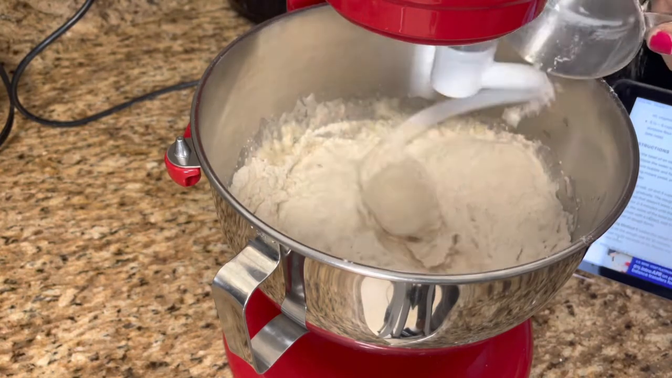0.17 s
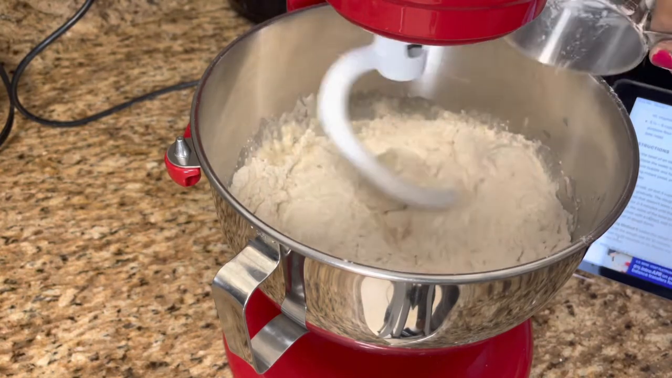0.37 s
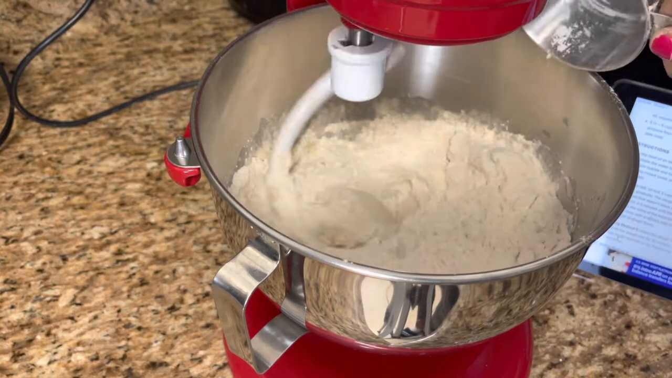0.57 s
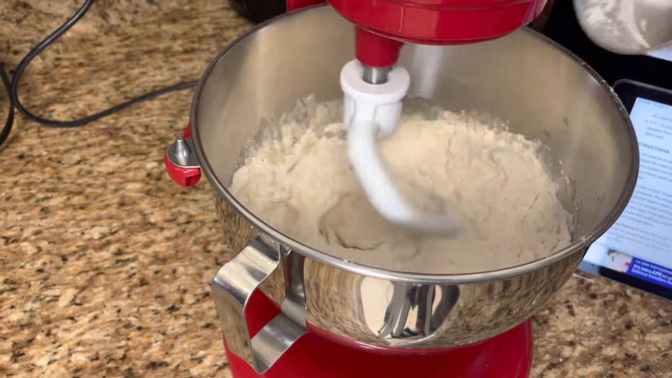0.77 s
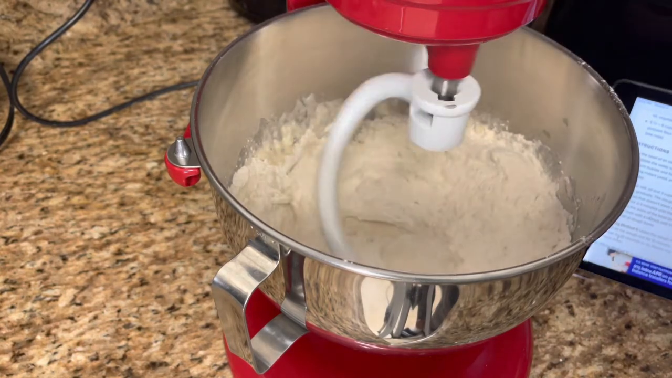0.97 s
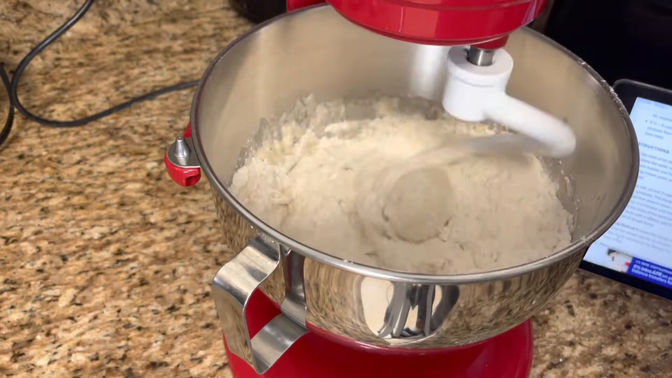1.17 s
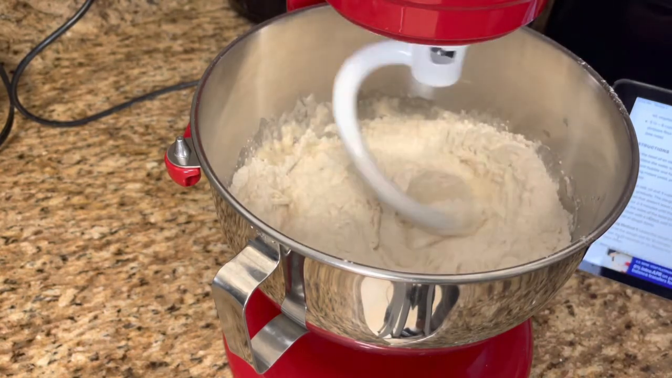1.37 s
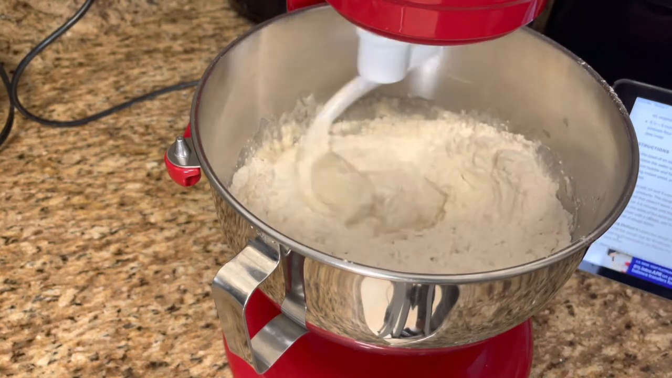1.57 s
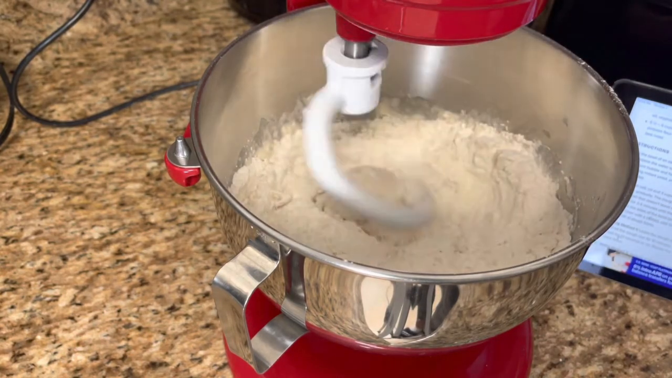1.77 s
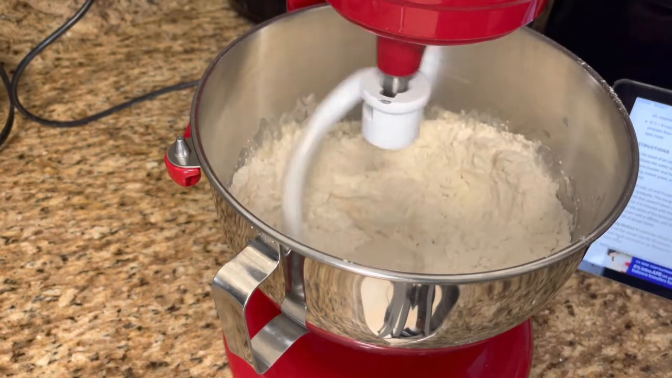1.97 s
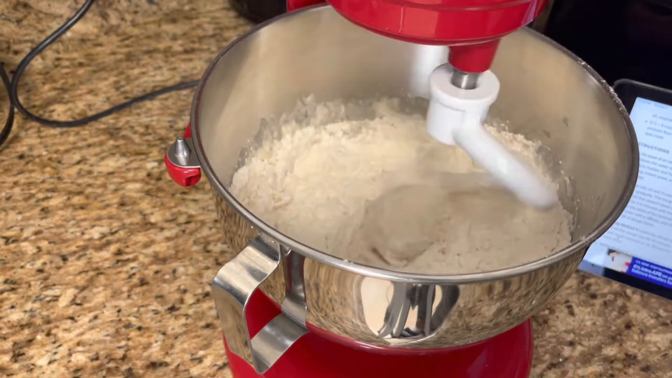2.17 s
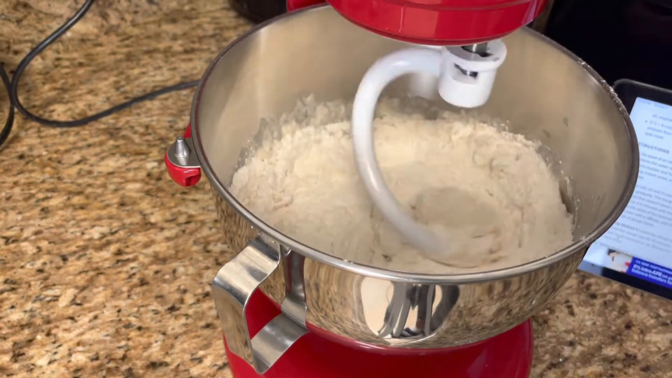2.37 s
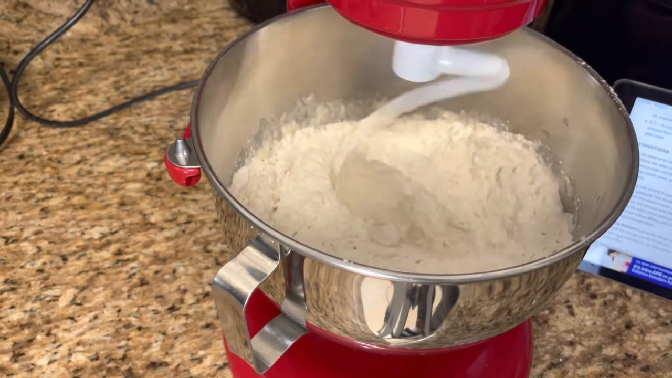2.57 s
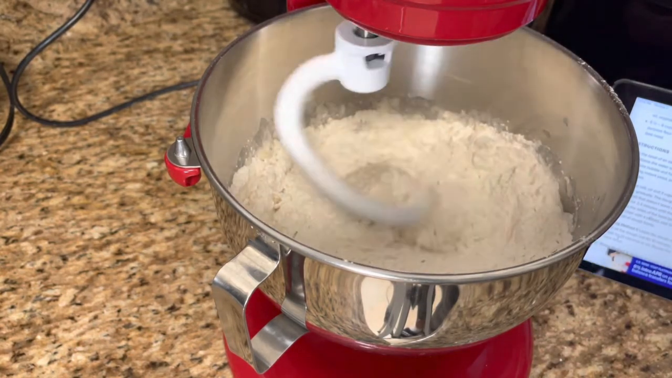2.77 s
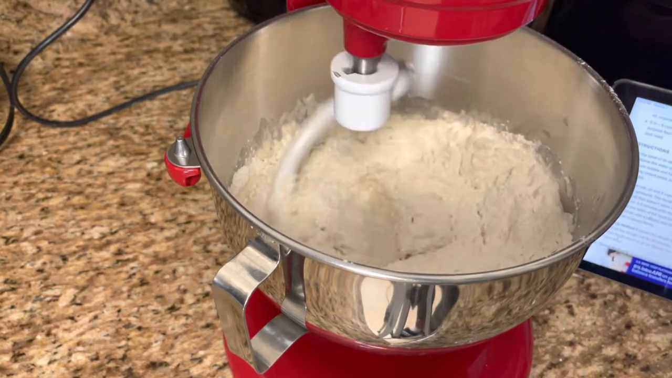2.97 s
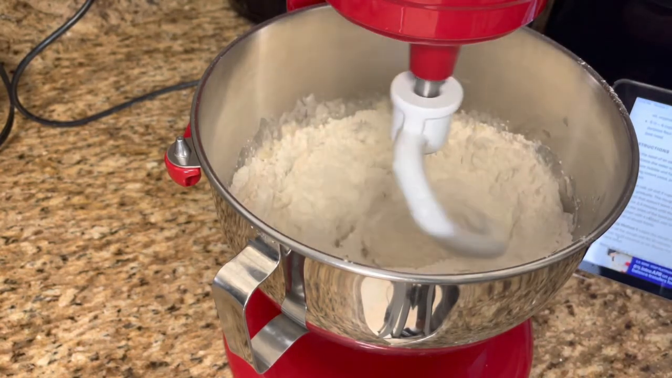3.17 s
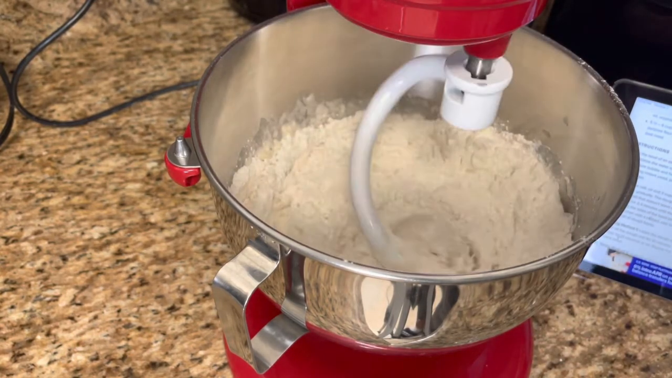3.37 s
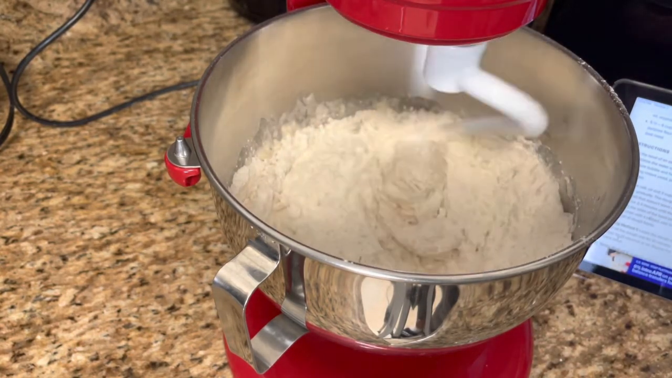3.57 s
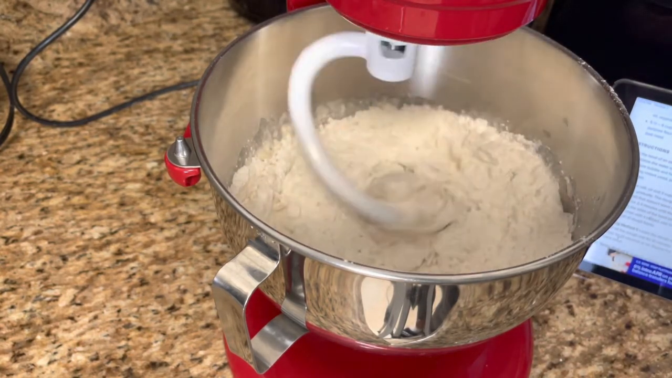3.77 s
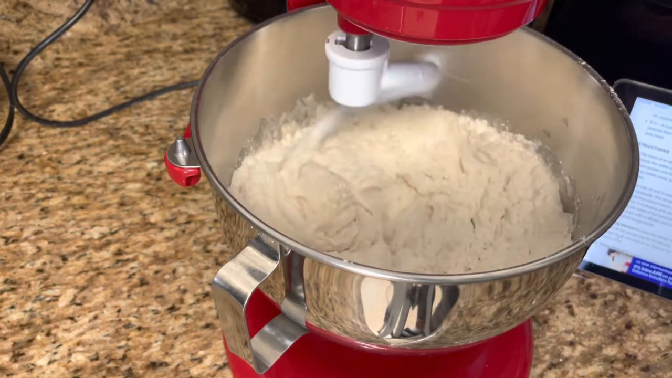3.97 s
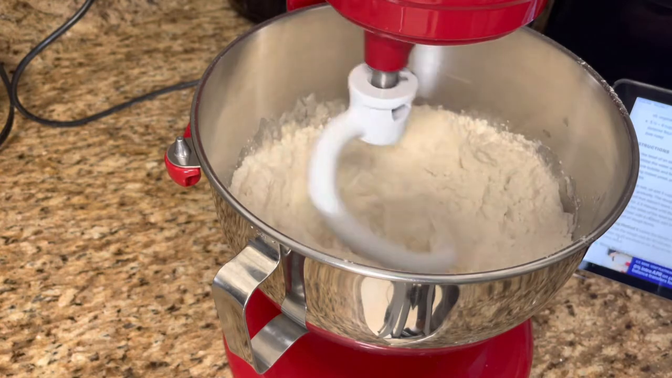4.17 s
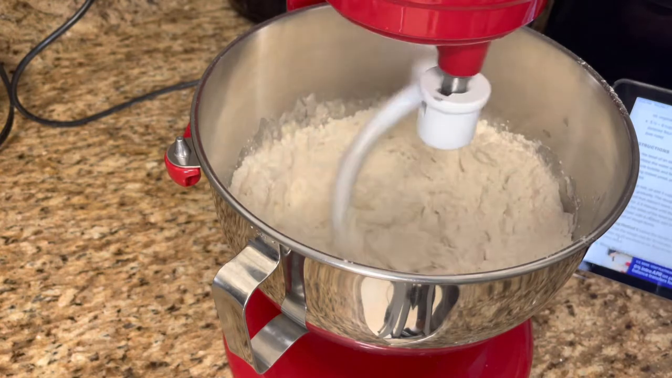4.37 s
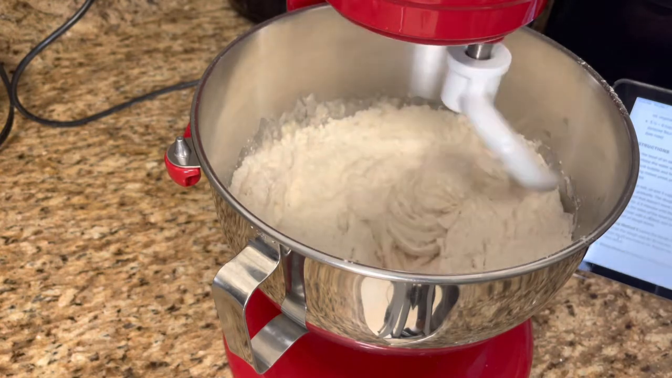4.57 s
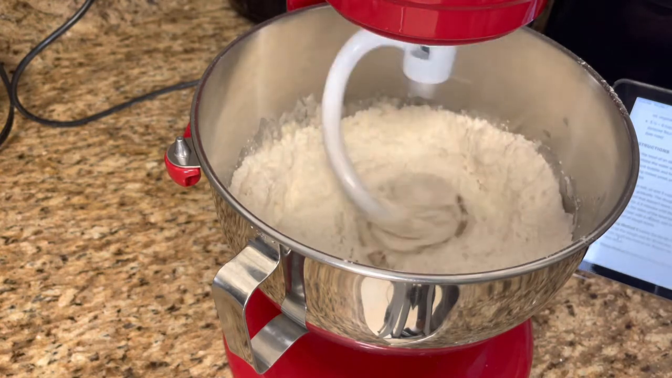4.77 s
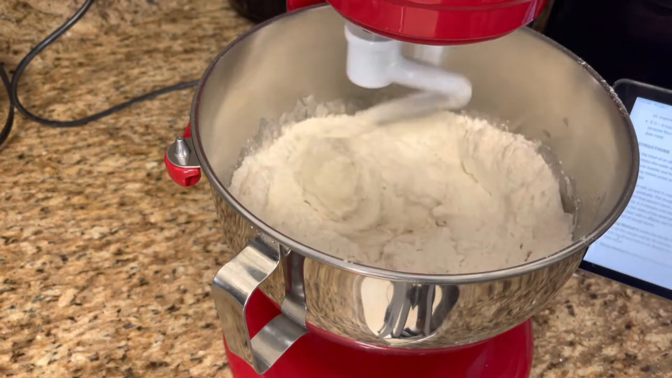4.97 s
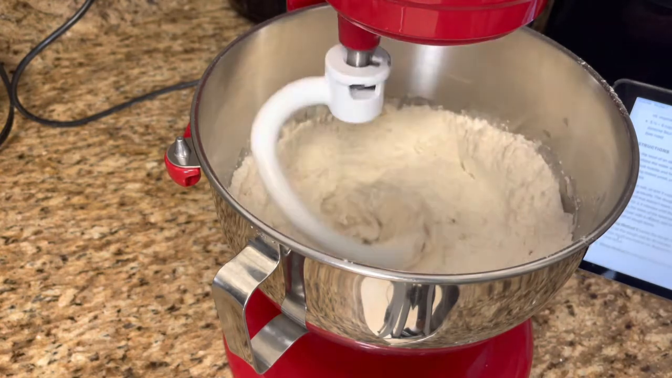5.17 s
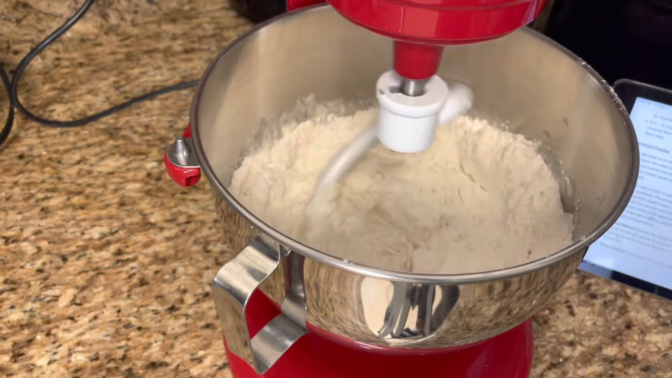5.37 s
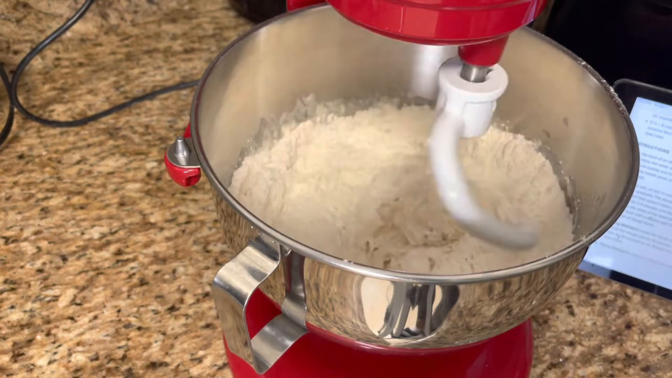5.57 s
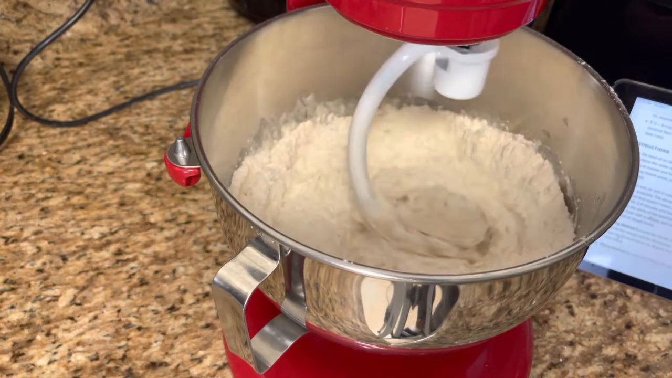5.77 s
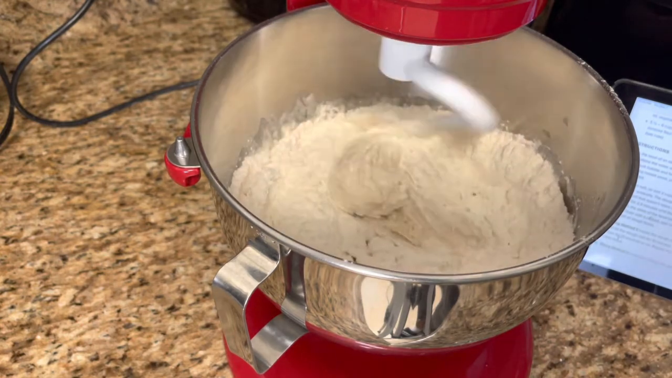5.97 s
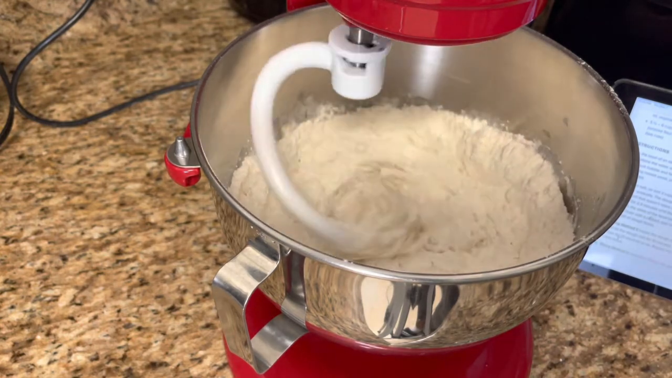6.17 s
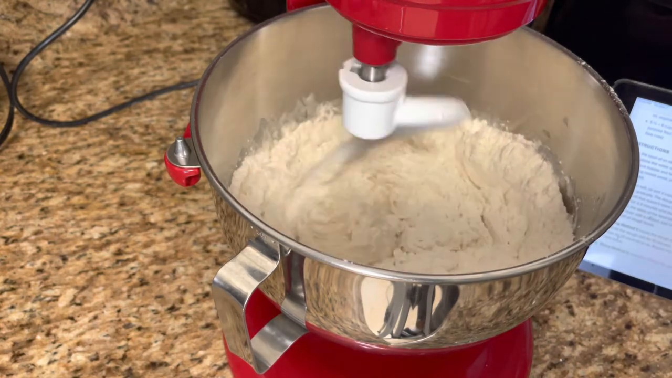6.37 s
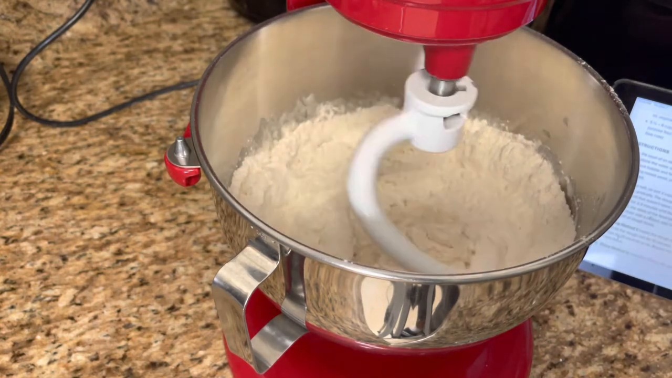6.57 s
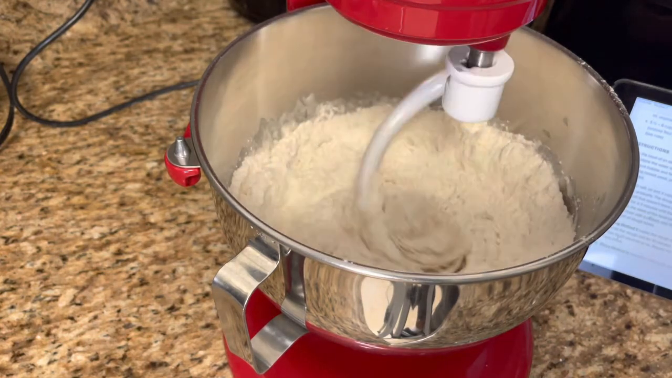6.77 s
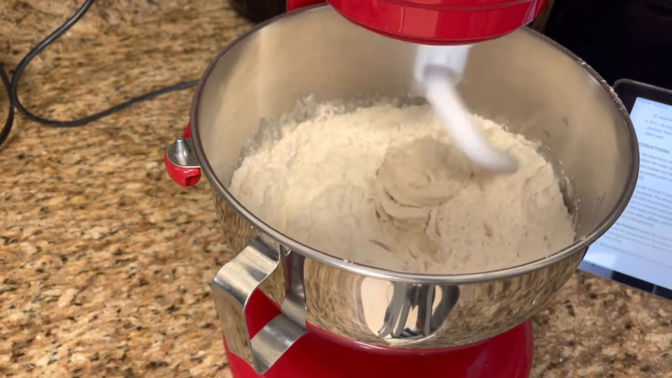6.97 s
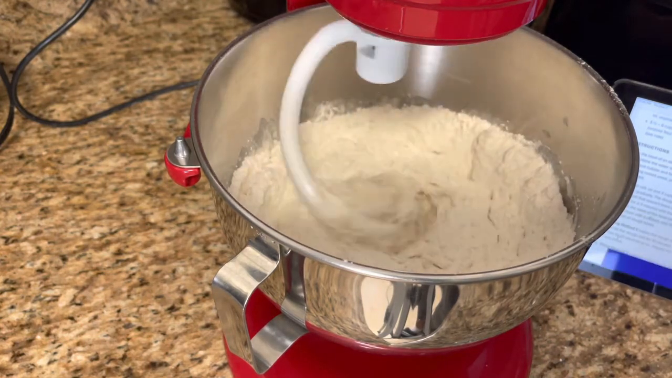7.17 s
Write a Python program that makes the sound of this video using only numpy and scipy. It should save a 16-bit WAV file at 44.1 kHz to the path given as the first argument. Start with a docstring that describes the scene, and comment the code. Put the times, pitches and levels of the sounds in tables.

```python
"""A stand mixer works floury dough in a steel bowl, close to a two-port microphone.
From the start, gear teeth whine, growl and shake the cast housing over mains hum and cooling air,
and the load on the hook slows and frees the shaft about three times a second. In the first half second
a steel cup knocks twice at the rim. Between two and four seconds the dough thumps softly three times.
The gears groan under load now and then, hardest near four seconds and again around six."""
import sys
import numpy as np
from scipy import signal
from scipy.fft import rfft, irfft, next_fast_len
from scipy.io import wavfile
from scipy.ndimage import uniform_filter1d, map_coordinates

SR = 44100
rng = np.random.default_rng(int(sys.argv[2]) if len(sys.argv) > 2 else 0)


def generate_wav(signal):
    """Clip the signal to [-1, 1] and save it as 16-bit WAV at the path in sys.argv[1]."""
    frames = np.transpose(np.atleast_2d(signal))
    scaled = np.clip(frames, -1, 1) * 32767
    pcm = np.round(scaled).astype(np.int16)
    wavfile.write(sys.argv[1], SR, pcm)


N = 318472

# Phase between the microphone ports. Each row: frequency in Hz, left lead in radians.
PORT_PHASE = [(60, 0), (7500, .2), (8500, -.3), (9700, -2.6), (10200, -3.14), (10500, -3.2), (11000, -4.2),
              (11350, -6.28)]


def amp(db):
    return 10 ** (np.asarray(db) / 20)


def unit_rms(x):
    return x / np.sqrt(np.mean(x ** 2) + 1e-20)


def along(hz, points_hz, values):
    """Values read on a log frequency axis."""
    return np.interp(np.log(hz + 1), np.log(np.asarray(points_hz) + 1), values)


def wobble(rate):
    """A smooth random curve, rate knots a second."""
    return map_coordinates(rng.standard_normal(int(N * rate / SR) + 4), [np.arange(N) * rate / SR])


def filtered(x, response):
    """x shaped by a complex frequency response."""
    size = next_fast_len(x.shape[-1] + SR // 4)
    return irfft(rfft(x, size) * response(np.fft.rfftfreq(size, 1 / SR)), size)[..., :x.shape[-1]]


def ports(pan_db, lead):
    """Complex gains of the left and right port, mean power 1; positive pan is to the left."""
    half = amp(pan_db / 2) * np.exp(.5j * lead)
    return np.array([half, 1 / half]) / np.sqrt((abs(half) ** 2 + abs(half) ** -2) / 2)


def peak(f, centre, width):
    """A resonance passed twice, so that its skirts are steep."""
    return (1j * f * width / (centre ** 2 - f * f + 1j * f * width)) ** 2


def resonate(x, modes):
    """x rung through a bank of panned resonances."""
    return filtered(x, lambda f: sum(amp(db) * ports(pan_db, lead)[:, None] * peak(f, hz, width)
                                     for hz, width, db, pan_db, lead in modes))


def tones(rows, cycles, drift, locked=False):
    """Stereo sines at multiples of a cycle count, drifting in level and phase; locked ones slip as one."""
    out = np.zeros((2, N))
    shared_slip = 2 * np.pi * rng.random() + drift * wobble(6)
    for multiple, db, pan_db, lead in rows:
        slip = shared_slip if locked else 2 * np.pi * rng.random() + drift * wobble(6)
        phase = 2 * np.pi * multiple * cycles + slip - lead / 2
        level = amp(db + 4 * drift * wobble(4))
        out += np.real(ports(pan_db, lead)[:, None] * level * np.exp(1j * phase))
    return np.sqrt(2) * out


def burst(t, low_hz, high_hz, rise, t60):
    """A stereo puff of noise between two soft band edges."""
    noise = 0.42 * rng.standard_normal((2, len(t))) + rng.standard_normal(len(t))
    band = unit_rms(filtered(noise, lambda f: f * f / (f * f + low_hz ** 2) / (1 + (f / high_hz) ** 4)))
    return band * (1 - np.exp(-t / rise)) * amp(-60 * t / t60)


def drive():
    """Shaft turns so far and gear levels; once a hook turn the dough slows the shaft and ducks the gears."""
    # The ride under the hook's swing. Each row: time in seconds, shaft turns a second,
    # whine level in dB, growl level in dB.
    ride = [(0, 8.723, -34.6, -33.0), (0.25, 8.638, -39.1, -40.1), (0.45, 8.593, -43.0, -44.3),
            (1.4, 8.664, -37.1, -38.3), (1.6, 8.778, -34.2, -36.9), (1.8, 8.542, -45.2, -43.3),
            (2.15, 8.71, -37.6, -37.0), (2.45, 8.626, -39.3, -43.0), (2.75, 8.696, -35.6, -41.0),
            (2.9, 8.707, -37.4, -40.3), (3.05, 8.625, -41.7, -41.4), (3.2, 8.666, -40.5, -41.0),
            (3.4, 8.759, -38.1, -34.4), (3.55, 8.592, -41.4, -41.8), (3.8, 8.579, -42.1, -44.8),
            (3.95, 8.521, -43.5, -45.4), (4.15, 8.699, -38.3, -38.0), (4.3, 8.646, -40.9, -40.8),
            (4.65, 8.653, -38.2, -40.6), (4.8, 8.654, -38.5, -40.0), (5.0, 8.586, -42.7, -43.2),
            (5.35, 8.638, -37.6, -41.5), (5.5, 8.609, -40.2, -43.2), (6.1, 8.653, -38.9, -41.4),
            (6.7, 8.622, -40.1, -41.0), (6.95, 8.688, -37.2, -39.2), (7.22, 8.599, -40.8, -43.7)]
    # Swells of the groan. Each row: time in seconds, level in dB.
    groan_swells = [(0.3, -51), (1.3, -55), (1.55, -40), (1.8, -55), (2.35, -51), (2.57, -39.5),
                    (2.8, -43.5), (3.8, -51), (3.95, -32), (4.1, -51), (4.93, -38), (5.2, -49), (5.8, -44),
                    (5.95, -34.5), (6.15, -47), (6.3, -36), (6.65, -59), (6.8, -40), (7.22, -45)]
    hook_hz, first_free_s, swing_hz, swing_db = 2.995, .107, .048, 2.4
    t = np.arange(N) / SR
    free = np.cos(2 * np.pi * hook_hz * (t - first_free_s))  # 1 running free, -1 deep in the dough
    times, *columns = np.transpose(ride)
    shaft_hz, whine_db, growl_db = (np.interp(t, times, column) for column in columns)
    turns = np.cumsum(shaft_hz + swing_hz * free) / SR
    groan_db = np.interp(t, *np.transpose(groan_swells))
    return turns, whine_db + swing_db * free, growl_db + swing_db * free, groan_db


def air_rush(level_db=-16, patchy_db=1.2, ripple_db=2):
    """A faintly patchy noise bed of cooling air and brushes; hard walls ripple its spectrum."""
    # Each row: frequency in Hz, relative level in dB, pan in dB, left-right likeness from 0 to 1.
    spectrum = [(33, -34, 1, .97), (55, -12, 2, 1), (245, -22, 0, 0.64), (542, -8, 4.5, 0.99),
                (770, -11.5, 0, 0.71), (1080, -13, -3.5, 0.76), (1140, -25, 2, 0.99),
                (1230, -16.5, 2, 0.098), (1710, -10.5, -3.5, 0.65), (2380, -17, 2, 0.16),
                (3970, -16, 1.5, 0.6), (4960, -12, 6, 0.59), (8680, -10.5, -0.5, 0.74),
                (8900, -7.5, 1.5, 1), (10800, -9.5, -5, 1), (11630, -15.5, 8, 0.69), (11800, -26, -3, 0.97),
                (12500, -80, 2, 1)]
    hz, db, pan_db, alike = np.transpose(spectrum)
    grains = signal.stft(rng.standard_normal((2, N)), nperseg=512)[2]
    patches = uniform_filter1d(rng.standard_normal(grains.shape[1:]), size=6, axis=0)
    patches = uniform_filter1d(patches, size=14, axis=1)
    noise = signal.istft(grains * amp(patchy_db * unit_rms(patches)), nperseg=512)[1][:, :N]
    knots = rng.standard_normal((2, 1000))
    ripple = lambda f, row: map_coordinates(knots[row], [f / 35]) * (f > 400)
    spread = lambda f: np.arccos(np.clip(along(f, hz, alike), 0, 1)) / 2
    colour = lambda f: amp(along(f, hz, db) + ripple_db * ripple(f, 0))
    mid, side = filtered(noise, lambda f: colour(f) * [np.cos(spread(f)), np.sin(spread(f))])
    scatter = lambda f: 5.0 * spread(f) * ripple(f, 1)  # reflections scatter the phase between the ports
    place = lambda f: ports(along(f, hz, pan_db), along(f, *np.transpose(PORT_PHASE)) + scatter(f))
    return amp(level_db) * filtered(np.array([mid + side, mid - side]), place)


def motor_hum(groan_db):
    """The motor hums on the mains; its highest tone swells with the groan."""
    # Each row: pitch in Hz, level in dB (the last relative to the groan), pan in dB, left lead in radians.
    partials = [(119.8, -58, 4, -0.1), (240.2, -61, 8, 0.5), (395.7, -54, 0, -0.3), (411.8, -55, 0, -0.2),
                (463.6, -50, -4, -0.2), (480.5, -53, -7, -1.3), (600.2, -1, 8, -2.5)]
    t = np.arange(N) / SR
    return tones(partials[:-1], t, drift=.2) + amp(groan_db) * tones(partials[-1:], t, drift=.3)


def dough_thumps():
    """Dough meets the bowl: a soft attack and no ring."""
    # Each row: start in seconds, level in dB, band centre in Hz.
    hits = [(2.334, -28, 1190), (2.675, -31, 1100), (3.36, -30.5, 710)]
    out, t = np.zeros((2, N + SR)), np.arange(SR // 3) / SR
    for start, db, hz in hits:
        thump = amp(db) * burst(t, 0.64 * hz, 1.8 * hz, rise=0.0096, t60=0.18)
        out[:, round(start * SR):][:, :len(t)] += thump
    return out[:, :N]


def cup_knocks():
    """The cup hits the rim flat, then edge on: ringing steel, crack, thud and the kitchen's short tail."""
    # Each row: start in seconds, crack level in dB, crack t60 in seconds, tail level in dB,
    # brightness in Hz, pan in dB.
    hits = [(0.1059, -11, 0.027, -21.5, 2950, 2), (.3415, -16, 0.02, -21, 11200, 4)]
    # Ring of cup and bowl. Each row: pitch in Hz, t60 in seconds, dB hit flat, dB hit edge on.
    steel_modes = [(785, .08, -20, -38), (1010, .15, -45, -28), (1300, .05, -14, -33),
                   (1443, .25, -30, -50), (1590, .09, -16.5, -40), (2249, 2.2, -40, -45),
                   (2602, .32, -18.5, -45), (2860, .035, -26, -13), (2975, .09, -19, -30),
                   (3575, .16, -30, -45), (3852, .32, -27.5, -45), (4130, .08, -45, -23),
                   (4506, .2, -45, -27), (4590, .21, -45, -26), (4752, .19, -45, -26), (5063, .2, -45, -25),
                   (5599, .3, -32, -45), (6722, .14, -45, -24), (7609, .35, -50, -29),
                   (8870, .04, -50, -16)]
    out, t = np.zeros((2, N + SR)), np.arange(SR) / SR
    for k, (start, crack_db, crack_t60, tail_db, bright_hz, pan_db) in enumerate(hits):
        ring = np.zeros((2, len(t)))
        for hz, t60, *levels_db in steel_modes:
            decay = amp(levels_db[k] + rng.normal(0, 1.2, (2, 1)) - 60 * t / t60)
            ring += decay * np.sin(2 * np.pi * (hz * t + rng.random((2, 1)) / 4))
        crack = amp(crack_db) * burst(t, 0.1 * bright_hz, bright_hz, rise=0.00071, t60=crack_t60)
        thud = amp(crack_db - 10) * burst(t, 76, 600, rise=0.0015, t60=0.092)
        tail = amp(tail_db) * burst(t, 0.09 * bright_hz, bright_hz, rise=0.0019, t60=0.2)
        knock = ring * (1 - np.exp(-t / 0.00073)) + crack + thud + tail
        out[:, round(start * SR):][:, :len(t)] += knock * amp([[pan_db / 2], [-pan_db / 2]])
    return out[:, :N]


def housing_rattle(turns, growl_db, low_db=-15.5, high_db=-16.0, sheen_db=-17):
    """Tooth errors, partly repeating every shaft turn, ring the housing and bowl."""
    # Each row: resonance in Hz, width in Hz, gain in dB, pan in dB, left lead in radians.
    body_modes = [(462, 40, -2, -3, -0.1), (538, 48, -4, 9, 1.2), (602, 45, -4, 7, -2.3),
                  (1035, 62, -8, 6, -1.9), (1614, 60, -3.5, 5, 0.4), (4360, 52, -7, 4, 2.2),
                  (4720, 70, -6, 9, -2.9), (5008, 51, -3, 2, -0.8), (5275, 66, -4, 9, -1),
                  (5345, 60, -3, 11, -1.7), (5630, 66, -3, 9, -0.6), (5932, 66, -5, 10, -2.7),
                  (6266, 85, 0, 14, 0.6), (6340, 80, -4, 8, .6), (6725, 53, -3, 4, -0.1),
                  (6850, 60, -6, 4, 0)]
    # Top resonances, reaching both ports as one wave. Each row: centre in Hz, width in Hz, gain in dB.
    sheen_modes = [(8774, 46, -2), (9022, 42, -4), (9216, 84, -3), (9517, 84, -2), (9969, 58, -1),
                   (10228, 82, 0), (10605, 74, 1), (10949, 84, -5)]
    errors = rng.standard_normal(size=4096)
    loop = unit_rms(map_coordinates(errors, [turns % 1 * len(errors)], mode="grid-wrap"))
    shake = lambda repeat: np.sqrt(repeat) * loop + np.sqrt(1 - repeat) * rng.standard_normal(N)
    swell_db = 0.53 * (growl_db - growl_db.mean())  # a freer, faster shaft rattles louder
    low = resonate(amp(low_db + swell_db) * shake(repeat=.32), body_modes[:5])
    beat = 1 + .1 * sum(np.cos(2 * np.pi * k * turns) for k in (6, 30, 72))
    chatter = amp(.4 * wobble(5)) * beat * shake(repeat=.4)
    high = resonate(amp(high_db) * chatter, body_modes[5:])
    place = lambda f: ports(0, along(f, *np.transpose(PORT_PHASE)))
    colour = lambda f: sum(amp(db) * peak(f, hz, width) for hz, width, db in sheen_modes)
    sheen = filtered(amp(sheen_db) * chatter, lambda f: place(f) * colour(f))
    return low + high + sheen


def off_centre_wheel(turns, runout_turns=.0012):
    """A wheel runs slightly off centre: one pair of tones warbles, another pulses with the shaft."""
    # Each row: multiple of the shaft rate, level in dB, pan in dB, left lead in radians.
    warble_tones = [(119, -47, 7, -2.2), (122, -53.5, 3, -.8)]
    pulse_tones = [(240, -52.5, -3, -2.4), (241, -53.5, -2, -2.2)]
    sway = runout_turns * np.cos(2 * np.pi * turns)
    warble = tones(warble_tones, turns + .035 + sway, drift=.3, locked=True)
    pulse = tones(pulse_tones, turns - .424, drift=.25, locked=True)
    return warble + pulse


def gear_teeth(turns, whine_db, growl_db, groan_db, flutter_db=.5, throb_db=2.5):
    """Meshing teeth sing: a high whine, a low growl, weaker throbbing tones and a groan under load."""
    # Each row: multiple of the shaft rate, relative level in dB, pan in dB, left lead in radians.
    whine_tones = [(186, 1.8, 5.5, .4), (184, -20, 1, -.1), (188, -14, 4, .3), (180, -18, -1, 1.8)]
    growl_tones = [(61, -1.5, 9, 1.3), (62, -1.5, 9, 1.3)]
    throb_tones = [(144, -13.5, -1, -.3), (258, -16, 2, -1.4)]
    groan_tones = [(72, -6, 6, -2.3), (70, -9, 7, -2.3)]
    flutter = flutter_db * wobble(22)  # the teeth mesh unevenly
    # The offsets set the shaft angle at which a locked group falls in step.
    whine = amp(whine_db + flutter) * tones(whine_tones, turns - .01, drift=.12, locked=True)
    growl = amp(growl_db) * tones(growl_tones, turns - .07, drift=.25, locked=True)
    throb = amp(growl_db + throb_db * np.cos(2 * np.pi * turns)) * tones(throb_tones, turns, drift=.4)
    groan = amp(groan_db) * tones(groan_tones, turns, drift=.35)
    return whine + growl + throb + groan


def scene():
    """One shaft drives all the gear layers; air, hum, cup and dough join them."""
    turns, whine_db, growl_db, groan_db = drive()
    gears = housing_rattle(turns, growl_db) + gear_teeth(turns, whine_db, growl_db, groan_db)
    gears += off_centre_wheel(turns)
    return gears + air_rush() + motor_hum(groan_db) + cup_knocks() + dough_thumps()


def record(dry, top_hz=12775):
    """A brick-wall low-pass on the whole mix."""
    return filtered(dry, lambda hz: hz < top_hz)


dry = scene()
out = record(dry)
generate_wav(out)
```